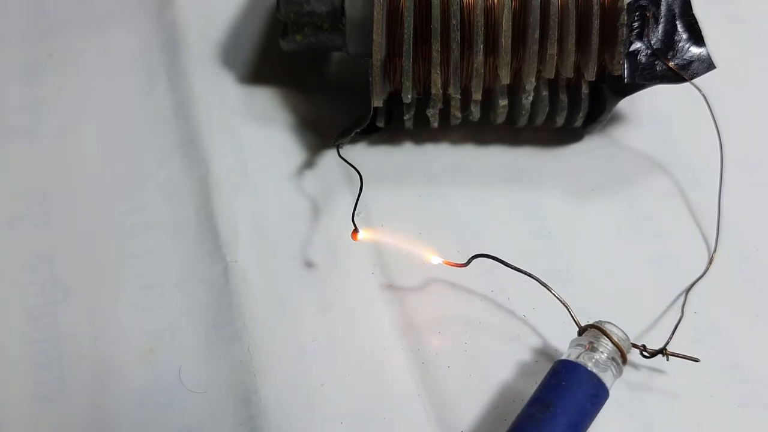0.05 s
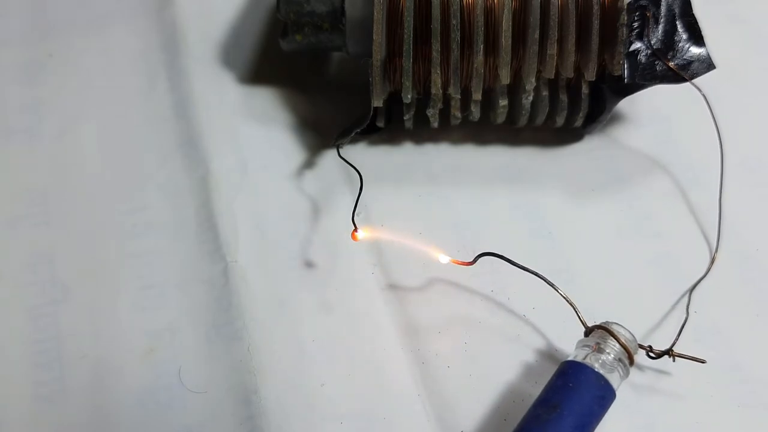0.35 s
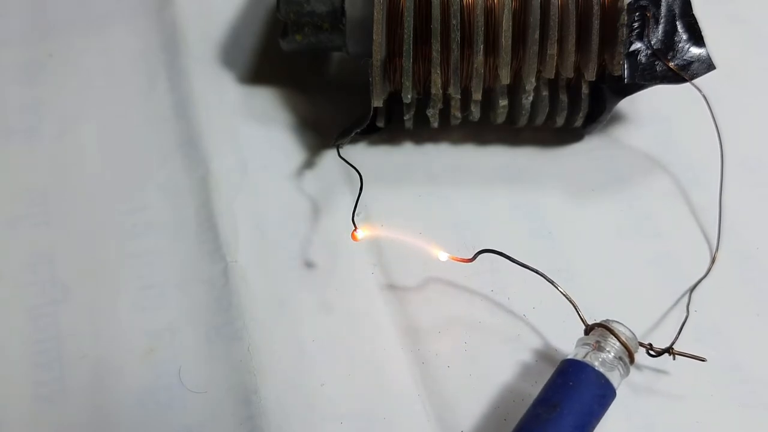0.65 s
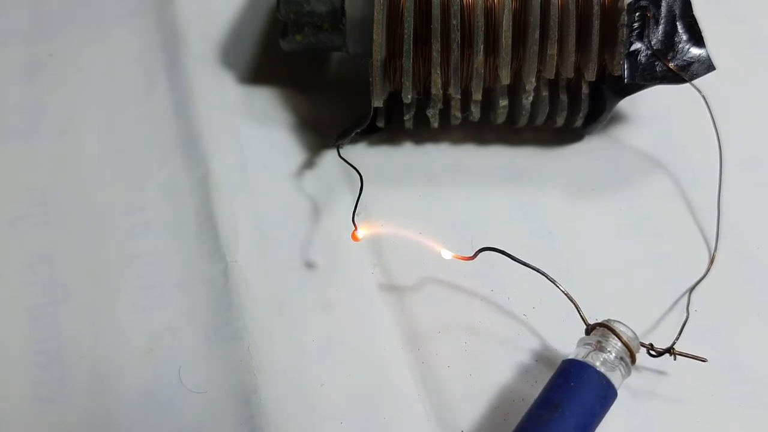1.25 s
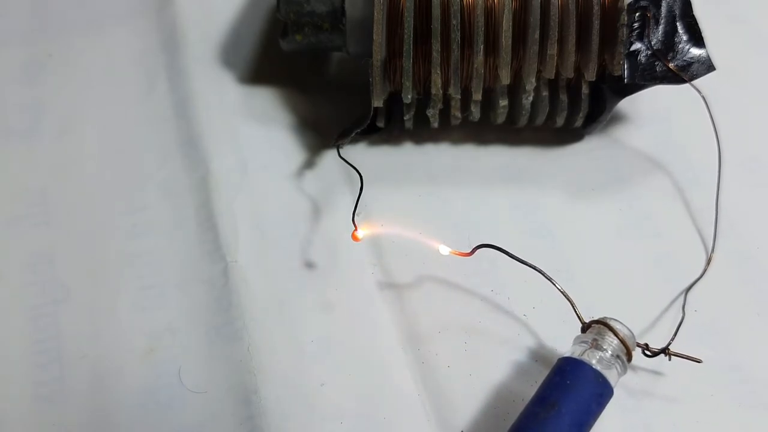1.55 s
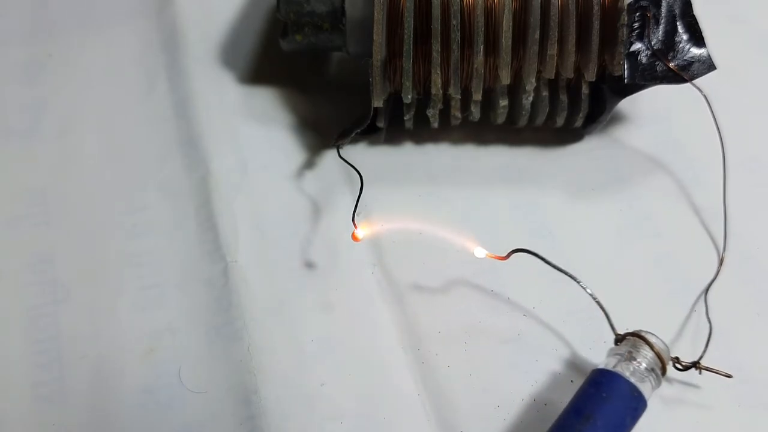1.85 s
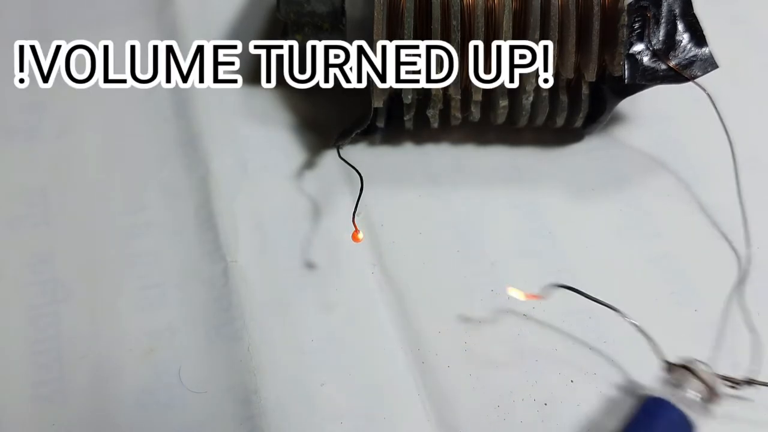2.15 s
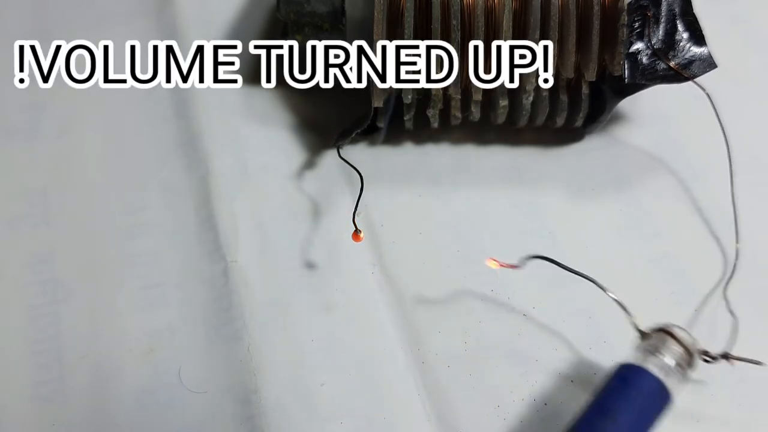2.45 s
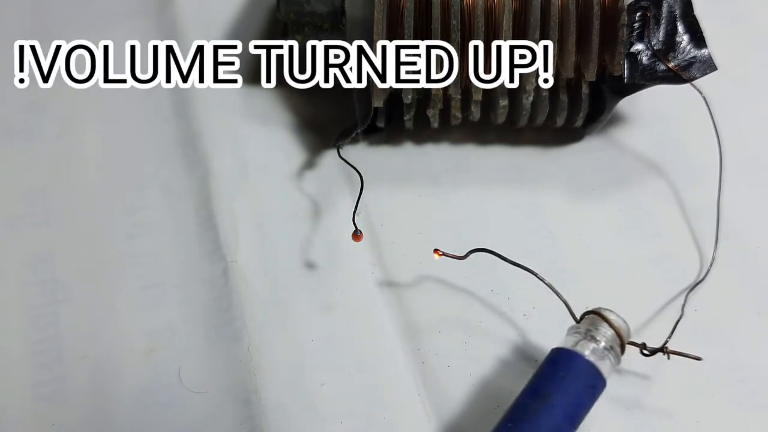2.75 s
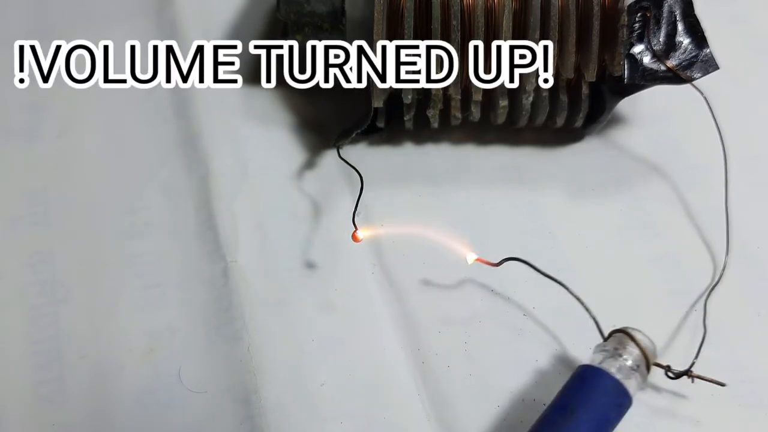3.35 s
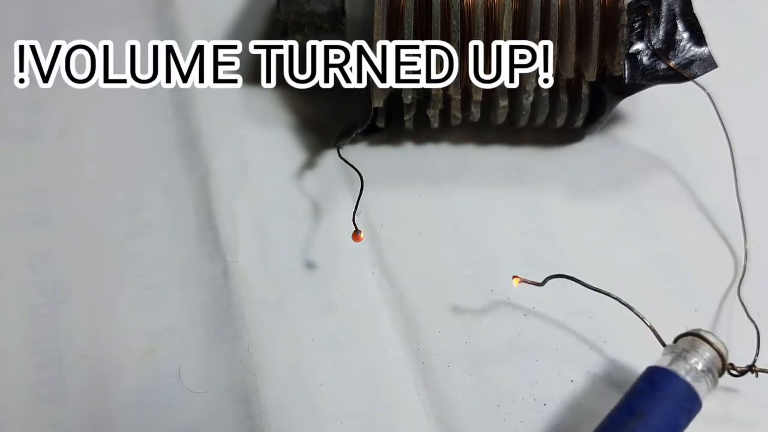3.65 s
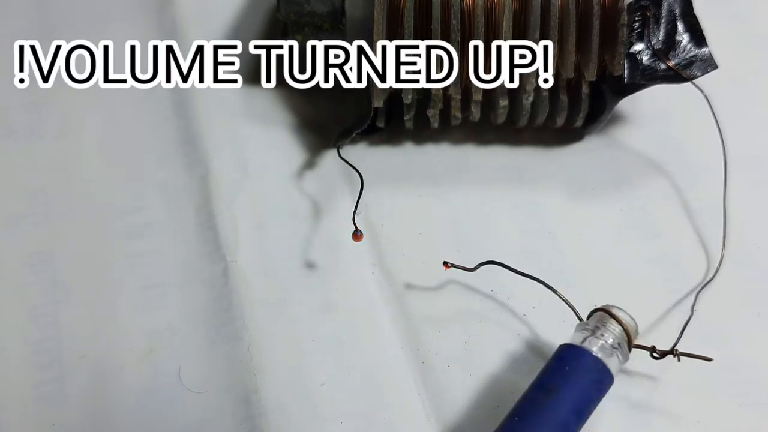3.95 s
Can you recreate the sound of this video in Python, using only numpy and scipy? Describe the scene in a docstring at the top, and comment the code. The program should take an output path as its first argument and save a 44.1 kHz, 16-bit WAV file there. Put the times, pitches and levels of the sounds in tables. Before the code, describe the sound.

A small electric arc hisses softly between two wires with a thin whistle, flares, flutters like a flame and snaps out. It restrikes twice with sparks and shrill squeals, close to the microphone in a faintly humming room.

```python
"""A quiet, humming room: on a table, near the microphone, a small high-voltage arc joins two wires.
The burning channel radiates broadband hiss and whistles at the pitch of its transformer.
Stretched, it flares, flutters like a flame and snaps out, and the transformer core rings briefly.
It is struck twice more, each time with a spark and a shrill squeal, and is pulled apart again."""
import sys
import numpy as np
from scipy import signal
from scipy.fft import rfft, irfft, next_fast_len
from scipy.io import wavfile
from scipy.ndimage import uniform_filter1d, minimum_filter1d, map_coordinates

SR = 44100
rng = np.random.default_rng(int(sys.argv[2]) if len(sys.argv) > 2 else 0)


def digitize_waveform(pressure):
    """Quantize a signal to 16-bit integers and store it at the path in sys.argv[1].

    Rows of a 2-D input are taken as channels; values are limited to [-1, 1].
    """
    field = np.atleast_2d(pressure).T
    bounded = np.clip(field, -1, 1)
    quanta = np.round(bounded * 32767).astype(np.int16)
    wavfile.write(sys.argv[1], SR, quanta)


N = 176400


def amp(db):
    """Decibel law: 20 dB is a factor of ten in amplitude."""
    return 10 ** (np.asarray(db) / 20)


def unit(x):
    """Normalisation to an rms of 1."""
    return x / np.sqrt(np.mean(x ** 2) + 1e-20)


def clock():
    """Uniform sampling: the time of each sample in seconds."""
    return np.arange(N) / SR


def along(points, hz):
    """Interpolation of (frequency, value) points on a logarithmic frequency axis."""
    point_hz, values = np.transpose(points)
    return np.interp(np.log(hz + 1), np.log(point_hz + 1), values)


def pan(side_db):
    """Constant-power panning: side_db is the level of the left channel over the right."""
    gains = np.array([np.atleast_1d(amp(side_db / 2)), np.atleast_1d(amp(-side_db / 2))])
    return gains / np.sqrt(np.mean(gains ** 2, axis=0))


def gate(t, length_s, rise_s, fall_s):
    """Exponential attack from t = 0 and exponential decay after length_s."""
    return (1 - np.exp(-np.maximum(t, 0) / rise_s)) * np.exp(-np.maximum(t - length_s, 0) / fall_s)


def wobble(knots_per_s):
    """Smooth random modulation: a spline through Gaussian values."""
    knots = rng.standard_normal(int(N * knots_per_s / SR) + 4)
    return map_coordinates(knots, [clock() * knots_per_s])


def filtered(x, response):
    """Linear filtering: the spectrum is multiplied by a frequency response."""
    size = next_fast_len(N + SR // 4)
    return irfft(rfft(x, size) * response(np.fft.rfftfreq(size, 1 / SR)), size)[..., :N]


def noise(spectrum, channels=1):
    """Spectral shaping: white noise is coloured and scaled to an rms of 1."""
    return unit(filtered(rng.standard_normal((channels, N)), lambda hz: amp(along(spectrum, hz))))


def add(out, start_s, sound):
    """Superposition: a sound is summed into out from start_s on."""
    part = out[:, max(round(start_s * SR), 0):][:, :sound.shape[-1]]
    part += sound[..., :part.shape[-1]]


# spectrum of the room's air noise: frequency_hz, density_db
AIR_SPECTRUM = [(20, -31.5), (45, -13), (100, -7.5), (170, -10), (260, -2.5), (370, 0.5), (480, -4.5),
                (700, -8.5), (1000, -16.5), (1300, -29), (1800, -28.5), (2400, -38.5), (3300, -39),
                (4800, -46), (6300, -29), (7500, -43.5), (9800, -41), (11200, -33), (12200, -51.5)]
# partials of the fan: pitch_hz, level_db
FAN_PARTIALS = [(301.5, -73), (376.8, -68), (544, -76.5), (646.0, -77.5), (748, -85), (861.3, -85),
                (1507, -92), (1724, -96.5)]
# set curve for the recorder's automatic gain, background held down, then recovering: time_s, gain_db
RECORDER_GAIN = [(0, -3.5), (1.7, -2.5), (2.25, 0.5), (2.7, 1.5), (4, 2.5)]

def air_and_fan(air_db=-63.5, coherence=0.36, waver_db=1.5, drift_hz=0.5):
    """Partly coherent air noise forms a continuous spectrum under the line spectrum of a fan."""
    air = np.sqrt(coherence) * noise(AIR_SPECTRUM)
    air = air + np.sqrt(1 - coherence) * noise(AIR_SPECTRUM, channels=2)
    hum = np.zeros(N)
    for pitch_hz, level_db in FAN_PARTIALS:
        level = amp(level_db + waver_db * wobble(6.4))
        phase = 2 * np.pi * np.cumsum(pitch_hz + drift_hz * wobble(6.12)) / SR
        hum += level * np.sqrt(2) * np.sin(phase)
    gain = amp(np.interp(clock(), *np.transpose(RECORDER_GAIN)))
    return gain * (amp(air_db) * air + hum)


# reverberation time of the room: frequency_hz, t60_s
ROOM_DECAY = [(150, 0.22), (2000, 0.35), (8000, .36), (15000, 0.15)]

def reverberation(x, early_t60_s=0.05, early_db=-9, tail_db=-16):
    """Convolution with a decaying response: early reflections off nearby things, then the room's tail."""
    hz, frame_s, spectra = signal.stft(rng.standard_normal((2, SR // 2)), SR, nperseg=256)
    decay = amp(-60 * frame_s / along(ROOM_DECAY, hz)[:, None])
    tail = signal.istft(spectra * decay, SR, nperseg=256)[1]
    t = np.arange(tail.shape[1]) / SR
    early = rng.standard_normal(tail.shape) * amp(-60 * t / early_t60_s)
    response = amp(tail_db) * tail / np.linalg.norm(tail[0])
    response += amp(early_db) * early / np.linalg.norm(early[0])
    return signal.fftconvolve(x, response, axes=1)[:, :N]


def direct_path(hz, left_lead_s=0.0001505):
    """Arrival-time difference: the sound reaches the nearer, left microphone port first."""
    return np.exp(1j * np.pi * hz * left_lead_s * np.array([[1], [-1]]))


# echoes off the table and the coil, left port then right: delay_s, gain
CLOSE_ECHOES = [
    [(.00085, 0.046), (.0019, -0.067), (.0034, 0.036)],
    [(.00078, 0.27), (.0021, -.3), (.0041, 0.15)],
]

def path_with_echoes(hz):
    """Comb filtering: the direct sound interferes with its closest echoes."""
    combs = [1 + sum(gain * np.exp(-2j * np.pi * hz * delay_s) for delay_s, gain in port)
             for port in CLOSE_ECHOES]
    return direct_path(hz) * np.array(combs)


# spectrum of every tick and crack: frequency_hz, density_db
CRACK_SPECTRUM = [(100, 13.5), (600, 6), (2000, -6.5), (4000, -7.5), (6000, -4), (10000, 7.5),
                  (12000, 11.5), (15200, 11), (16300, -17.5)]
# resonances of the transformer core: centre_hz, bandwidth_hz, gain_db
CORE_MODES = [(5370, 980, -9.5), (8100, 140, 10), (10600, 550, -6), (13600, 1300, -0.5)]
# breaks of the current: start_s, level_db
BREAKS = [(2.2003, -33), (3.511, -35)]
TICK_DECAY_S = 0.00041

def snaps(tick_gain_db=3, ring_gain_db=-2.5, ring_decay_s=0.0032):
    """Damped resonance: the current breaks with a tick and a dry ring of the transformer core."""
    def core(hz):
        return sum(amp(db) / (1 + (2 * (hz - centre) / width) ** 2) for centre, width, db in CORE_MODES)

    tick, ring = np.zeros((2, 1, N))
    t = np.arange(SR // 5) / SR
    for start_s, level_db in BREAKS:
        add(tick, start_s, amp(level_db + tick_gain_db) * np.exp(-t / TICK_DECAY_S))
        add(ring, start_s, amp(level_db + ring_gain_db) * np.exp(-t / ring_decay_s))
    return tick * noise(CRACK_SPECTRUM) + ring * unit(filtered(rng.standard_normal(N), core))


# spectrum of the air's rumble, during and after the arc: frequency_hz, density_db
RUMBLE_SPECTRUM = [(20, -35.5), (40, -8), (65, 4), (130, -4), (300, -14.5), (700, -23.5), (2000, -50)]

def wake(level_db=-50):
    """Exponential decay: the air still rumbles after the last break."""
    envelope = gate(clock() - BREAKS[-1][0], 0, rise_s=0.00024, fall_s=0.18)
    return amp(level_db) * envelope * noise(RUMBLE_SPECTRUM, channels=2)


# spark discharges: start_s, level_db, side_db
DISCHARGES = [(0.144, -58, -9), (0.19, -48, -4), (0.357, -51.5, 7), (0.37, -48, -3), (0.404, -49.5, 11),
              (0.517, -51, 13), (0.655, -51, 3), (.6712, -48, 1), (.6845, -52, 2), (.716, -44.5, -2),
              (0.7346, -46, 7), (.7515, -52, -3), (.7588, -44.5, 6), (.7662, -48.5, 4), (0.7763, -41.5, 15),
              (0.782, -46, -5), (0.8195, -46.5, 8), (.8292, -46, 6), (1.7458, -40, 5), (1.8445, -43.5, 1),
              (1.8504, -51, 9), (1.877, -53.5, 9), (1.9025, -48, -0.5), (2.0135, -49.5, 1),
              (2.1423, -52, 7), (2.9686, -33, 3.5), (2.982, -42.5, 12), (2.9983, -31.5, -1.5),
              (3.0655, -30, 1.5), (3.075, -50, -4), (3.0812, -45.5, 7), (3.3125, -24.5, 32.5),
              (3.3155, -25.5, 35), (3.328, -24.5, 10)]

def sparks(decay_s=0.00074, median_pulse_db=-48.5, pulse_s=0.00036, pulse_db_per_db=0.7):
    """Impulsive sources: each spark is a dry crack with one pressure pulse that grows with its level."""
    envelope, pressure = np.zeros((2, 2, N))
    t = np.arange(SR // 30) / SR
    median_db = np.median(np.transpose(DISCHARGES)[1])
    pulse = -t / pulse_s * np.exp(1 - t / pulse_s)
    for start_s, level_db, side_db in DISCHARGES:
        add(envelope, start_s, amp(level_db) * pan(side_db) * np.exp(-t / decay_s))
        pulse_db = median_pulse_db + pulse_db_per_db * (level_db - median_db)
        add(pressure, start_s, amp(pulse_db) * pan(side_db) * pulse)
    return envelope * noise(CRACK_SPECTRUM) + pressure


# pops of the flame: centre_s, peak_db, half_width_s, side_db
FLAME_POPS = [(1.838, -30, 0.00044, -22.5), (1.854, -28, 0.0014, -21.5), (1.864, -42.5, 0.0025, 1.5),
              (1.881, -34.5, 0.00073, -2), (1.912, -27.5, 0.00091, -11.5), (1.947, -40, 0.0015, 1),
              (2.0036, -42, 0.00044, -17), (2.024, -30, 0.0023, -5.5), (2.041, -38, 0.0019, 6),
              (2.0533, -32.5, 0.0018, -21), (2.144, -29.5, 0.001, -1), (2.1531, -35, 0.0011, -15),
              (2.1612, -31, 0.0027, -7), (2.187, -29, 0.00049, -19), (2.968, -33.5, 0.00042, 18),
              (2.977, -39.5, 0.0015, 15), (3.067, -34, 0.0011, -15), (3.3232, -30, 0.00087, 24),
              (3.3316, -27.5, 0.0022, 30.5), (3.403, -31.5, 0.0011, -14), (3.424, -23.5, 0.0018, -15.5)]

def pops(left_lag_s=0.0014):
    """Bipolar pulses: the hot channel jumps, pushing then pulling air; the gust arrives right first."""
    out = np.zeros((2, N))
    for centre_s, peak_db, half_width_s, side_db in FLAME_POPS:
        offset = (clock() - centre_s - np.array([[left_lag_s], [0]])) / half_width_s
        out -= amp(peak_db) * pan(side_db) * offset * np.exp((1 - offset ** 2) / 2)
    return out


# chirps of the flame: start_s, length_s, level_db, first_hz, last_hz, buzz_ratio, side_db
FLAME_CHIRPS = [(0.024, 0.0078, -61, 604, 914, 0.24, 18), (0.08, 0.017, -64.5, 730, 982, 0.1, 24),
                (0.183, 0.032, -68.5, 1320, 1014, 0.1, 24), (0.262, 0.031, -73, 1157, 1450, 0.2, 13),
                (0.371, 0.055, -73, 1138, 1600, .05, 17), (0.422, 0.13, -73, 1293, 1320, .05, 23),
                (1.725, 0.016, -66, 1390, 2122, .05, 4), (1.836, 0.015, -34, 428, 518.5, 0.56, -2.5),
                (1.867, 0.012, -55.5, 990, 1454, 0.7, 7.5), (1.968, 0.024, -53, 847, 1240, 0, -18),
                (2.024, 0.036, -55.5, 905, 1657, 0.11, -12), (2.171, 0.0184, -50.5, 1012, 1774, 0.09, -9)]
FLAME_RISE_S, FLAME_FALL_S = 0.00024, 0.0021

def sputters(jitter_hz=70, rough_db=4):
    """Harmonic series: the flame's rough glides sharpen into pulse trains as their overtones grow."""
    out = np.zeros((2, N))
    t = np.arange(SR // 6) / SR
    jitter = jitter_hz * wobble(350)
    for start_s, length_s, level_db, first_hz, last_hz, buzz_ratio, side_db in FLAME_CHIRPS:
        hz = np.interp(t, [0, length_s], [first_hz, last_hz]) + jitter[round(start_s * SR):][:len(t)]
        phasor = np.exp(2j * np.pi * np.cumsum(hz) / SR)
        # geometric series: each harmonic is buzz_ratio times the one below
        pulses = unit((phasor / (1 - buzz_ratio * phasor)).real)
        envelope = gate(t, length_s, FLAME_RISE_S, FLAME_FALL_S)
        add(out, start_s, amp(level_db) * pan(side_db) * envelope * pulses)
    return out * unit(amp(rough_db * wobble(280)))


# spectrum of the flame before its low-pass: frequency_hz, density_db
FLAME_SPECTRUM = [(20, -30.5), (45, 11), (110, 2.5), (200, -8), (450, -4), (900, -16), (2000, -24),
                  (6000, -36.5)]
# puffs of the flame: start_s, length_s, level_db, first_cutoff_hz, last_cutoff_hz, side_db
FLAME_PUFFS = [(0.013, 0.015, -52, 810, 900, 14), (0.08, 0.016, -53, 895, 990, 28),
               (0.136, 0.012, -52.5, 390, 298, 19), (0.34, 0.036, -61, 580, 700, 18),
               (.618, 0.013, -53.5, 500, 600, 24), (1.834, 0.011, -37, 1300, 1810, -12.5),
               (1.864, 0.014, -37, 1000, 2030, -1.5), (1.897, 0.017, -35.5, 900, 980, -8),
               (1.926, 0.032, -40.5, 500, 476, -4.5), (1.965, 0.034, -42.5, 1020, 1000, -34),
               (2.017, 0.034, -37, 700, 1420, -9.5), (2.137, 0.028, -34, 450, 403, -4.5),
               (2.17, 0.0236, -37, 900, 2300, -16.5), (2.966, 0.019, -42.5, 2150, 894, -3),
               (2.993, 0.022, -48.5, 600, 390, -4.5), (3.064, 0.022, -41, 690, 590, -12),
               (3.324, 0.007, -37.5, 1810, 2400, 21), (3.388, 0.053, -37, 1100, 600, -22.5),
               (3.441, 0.028, -41, 1200, 1610, -19.5), (3.48, 0.019, -37, 604, 1107, -16)]

def flutter(order=1.43, peak_db=5, peak_width=0.16):
    """Resonant low-pass noise: each puff of the flame has a sliding upper edge that sings a little."""
    out = np.zeros((2, N))
    t = np.arange(SR // 3) / SR
    for start_s, length_s, level_db, first_hz, last_hz, side_db in FLAME_PUFFS:
        hz, frame_s, spectra = signal.stft(rng.standard_normal((2, len(t))), SR, nperseg=512)
        cutoff_hz = np.interp(frame_s, [0, length_s], [first_hz, last_hz])
        ratio = hz[:, None] / cutoff_hz
        colour = amp(along(FLAME_SPECTRUM, hz))[:, None] / np.sqrt(1 + ratio ** (2 * order))
        resonance = amp(peak_db / (1 + ((ratio - 1) / peak_width) ** 2))
        puff = signal.istft(spectra * colour * resonance, SR, nperseg=512)[1][:, :len(t)]
        puff *= gate(t, length_s, FLAME_RISE_S, FLAME_FALL_S)
        rms = np.sqrt(np.sum(puff ** 2, axis=1, keepdims=True) / (length_s * SR))
        add(out, start_s, amp(level_db) * pan(side_db) * puff / rms)
    return out


# squeals and the beat tone (at 1.773 s): start_s, length_s, level_db, first_hz, last_hz, noise_share
TONE_GLIDES = [(1.743, .014, -33, 15040, 11900, 0.6), (1.773, 0.035, -37.5, 10150, 1677, 0.02),
               (2.1987, 0.0024, -32.5, 15800, 14440, 0.3), (2.9696, 0.0027, -15, 15400, 15100, .02),
               (2.973, 0.0075, -17.5, 14600, 13900, 0.2), (2.983, 0.068, -50, 14200, 14250, 1),
               (3.31, 0.025, -33, 15630, 15500, .15), (3.329, 0.012, -6.5, 15100, 15450, 0.02),
               (3.34, 0.037, -57, 15900, 15700, .3), (3.5, 0.002, -47, 15200, 14200, .3)]

def squeals_and_beat(jitter_hz=50, fizz_per_s=1000):
    """Frequency modulation: short squeals of the whistle, and one long falling beat tone in the flare."""
    out = np.zeros((1, N))
    t = np.arange(SR // 8) / SR
    jitter = jitter_hz * wobble(600)
    fizz = unit(wobble(fizz_per_s)) + 1j * unit(wobble(fizz_per_s))
    for start_s, length_s, level_db, first_hz, last_hz, noise_share in TONE_GLIDES:
        samples = round(start_s * SR) + np.arange(len(t))
        hz = np.interp(t, [0, length_s], [first_hz, last_hz]) + jitter[samples]
        amplitude = np.sqrt(2 * (1 - noise_share)) + np.sqrt(noise_share) * fizz[samples]
        tone = (amplitude * np.exp(2j * np.pi * np.cumsum(hz) / SR)).imag
        add(out, start_s, amp(level_db) * gate(t, length_s, rise_s=0.00067, fall_s=0.0018) * tone)
    return out


# spectrum of the whistle's sizzling lower fringe: frequency_hz, density_db
SIZZLE_SPECTRUM = [(9000, -110), (12000, -46), (13500, -35), (14500, 1), (15100, -5), (15450, 10),
                   (15750, -44.5)]
# course of the transformer's whistle: time_s, tone_db, sizzle_db
WHISTLE_LEVELS = [(0.002, -17, -31), (0.006, -45, -19), (0.017, -9, -21.5), (0.024, -20, -18),
                  (0.032, -40, -58), (0.052, -50, -50), (0.104, -23.5, -38), (0.154, -49, -62),
                  (0.168, -39, -44), (0.221, -35.5, -38), (0.26, -54, -58), (0.276, -57, -41),
                  (0.332, -80, -58), (0.36, -62, -48.5), (0.524, -71, -51), (0.59, -82, -64),
                  (0.62, -69, -48), (0.65, -93, -82)]

def whistle(pitch_hz=15450, jitter_hz=45, rough_db=3, tone_gain_db=3.5, sizzle_gain_db=-5):
    """Forced oscillation: the transformer drives a thin, unsteady tone that fades as the arc settles."""
    time_s, tone_db, sizzle_db = np.transpose(WHISTLE_LEVELS)
    t = clock()
    phase = 2 * np.pi * np.cumsum(pitch_hz + jitter_hz * wobble(293.5)) / SR
    tone = amp(np.interp(t, time_s, tone_db) + tone_gain_db) * np.sqrt(2) * np.sin(phase)
    sizzle = amp(np.interp(t, time_s, sizzle_db) + sizzle_gain_db) * noise(SIZZLE_SPECTRUM)
    roughness = unit(amp(rough_db * wobble(207.7)))
    return (tone + sizzle) * roughness * gate(t, time_s[-1], rise_s=0.0018, fall_s=0.05)


def crackle(ticks_per_s=30, over_rasp_db=17, scatter_db=4):
    """Poisson process: stray ticks at independent random moments, each decaying exponentially."""
    onsets = rng.random(N) < ticks_per_s / SR
    strength = amp(over_rasp_db + scatter_db * np.clip(rng.standard_normal(N), -2, 1.5))
    envelope = signal.lfilter([1], [1, -np.exp(-1 / (TICK_DECAY_S * SR))], onsets * strength)
    return envelope * noise(CRACK_SPECTRUM)


# spectra of the arc's treble hiss and midrange rasp: frequency_hz, density_db
HISS_SPECTRUM = [(2500, -37), (5000, -19), (5600, -17), (6500, -17), (7200, -27.5), (8000, -18),
                 (9200, -9.5), (10200, -18.5), (11000, -5.5), (11850, -5.5), (12700, -5.5), (14000, -3),
                 (15450, 2.5), (15800, -41.5)]
RASP_SPECTRUM = [(100, 8), (400, 6), (1000, 0.5), (2200, -0.5), (3200, -2), (4400, -3), (6200, -21),
                 (8000, -25), (12000, -28)]
# course of the calm arc: time_s, hiss_db, rasp_db, rasp_side_db, rumble_db
CALM_ARC = [(0.01, -54, -68, 11, -59), (0.222, -74.5, -93.5, -7, -69), (0.366, -62.5, -73.5, 20, -65.5),
            (0.524, -66.5, -77.5, 23.5, -71), (0.572, -68, -78, 11, -100.5), (0.616, -70, -75, 16.5, -76),
            (0.712, -74, -91, 9, -59), (0.784, -70, -75, 13, -64), (0.81, -76, -77, 17, -77),
            (0.866, -62.5, -73.5, 13, -76), (1.01, -68, -75.5, 7, -70), (1.054, -55, -71.5, 8, -67.5),
            (1.12, -57, -85, -3, -67), (1.228, -56, -92, 5, -74.5), (1.566, -58.5, -70, 30, -60),
            (1.584, -58.5, -71.5, 10, -79.5), (1.628, -58, -66, 15, -57.5), (1.706, -57, -74, 5, -80.5),
            (1.74, -58, -64.5, 10, -43.5)]
# courses of the unsteady arc, one per stretch: same columns
UNSTEADY_ARCS = [
    [(1.815, -56.5, -50.5, 0, -52), (1.974, -77, -93, 0, -57), (2.048, -59, -75.5, 0, -47),
     (2.11, -61.5, -69, 0, -56), (2.132, -56.5, -67, 0, -54), (2.142, -65, -59, 0, -58),
     (2.185, -83, -103.5, 0, -75)],
    [(2.97, -52, -64, 0, -54), (3.005, -58.5, -68, 0, -55.5), (3.055, -64, -81.5, 0, -45),
     (3.087, -64.5, -72.5, 0, -56.5), (3.243, -68.5, -86, 0, -52), (3.29, -82.5, -102, 0, -58)],
    [(3.398, -47, -46.5, 0, -60.5), (3.412, -62.5, -51, 0, -55), (3.442, -57.5, -62, 0, -57),
     (3.494, -65, -90.5, 0, -46), (3.5, -65, -54, 0, -48.5)],
]
# flares of the arc: start_s, length_s, hiss_db, rasp_db
ARC_FLARES = [(1.746, 0.0352, -24.5, -43), (1.779, 0.024, -26.5, -38.5), (1.797, 0.014, -32, -32.5),
              (3.324, 0.062, -58.5, -71), (3.376, .006, -35, -53.5), (3.3816, 0.0097, -19.5, -35)]

def burning_arc(rasp_gain_db=2.5, rumble_gain_db=3.5, flare_side_db=6, rise_s=0.0015, fall_s=0.0041):
    """Amplitude-modulated noise: the channel's grainy hiss and rasp leap in flares over a lumpy rumble."""
    def wide(spectrum, spread_db=-6):
        return unit(noise(spectrum) + amp(spread_db) * noise(spectrum, channels=2))

    t = clock()
    hiss, rasp, rumble = np.zeros(N), np.zeros((2, N)), np.zeros(N)  # envelopes
    for course in [CALM_ARC] + UNSTEADY_ARCS:
        time_s, *columns = np.transpose(course)
        hiss_db, rasp_db, side_db, rumble_db = [np.interp(t, time_s, column) for column in columns]
        lit = gate(t - time_s[0], time_s[-1] - time_s[0], rise_s, fall_s)
        hiss += lit * amp(hiss_db)
        rasp += lit * amp(rasp_db + rasp_gain_db) * pan(side_db)
        rumble += lit * amp(rumble_db + rumble_gain_db)
    ticks = rasp * crackle()
    for start_s, length_s, hiss_db, rasp_db in ARC_FLARES:
        lit = gate(t - start_s, length_s, rise_s, fall_s)
        hiss = np.maximum(hiss, lit * amp(hiss_db))
        rasp = np.maximum(rasp, lit * amp(rasp_db) * pan(flare_side_db))
    grain = unit(amp(2 * wobble(900) + wobble(29.9)))  # 2 dB of fast grain, 1 dB of slow waver
    hiss_and_rasp = grain * (hiss * wide(HISS_SPECTRUM) + rasp * wide(RASP_SPECTRUM))
    lumps = amp(3 * wobble(27))
    return ticks + hiss_and_rasp + rumble * unit(lumps * noise(RUMBLE_SPECTRUM, channels=2))


# level difference of the arc at the two microphone ports: frequency_hz, side_db
PORT_BALANCE = [(400, 4.5), (1200, 6.5), (5000, 3), (6500, 1), (8000, -6), (9300, -2), (10800, 3.5),
                (11900, 0), (13400, 4), (14200, 7), (15300, 16)]

def scene():
    """Superposition of direct and reverberant sound: the arc is nearer the left port; the room hums."""
    tones = whistle() + squeals_and_beat()
    noises = burning_arc() + flutter() + pops() + sputters() + sparks() + snaps()
    close = filtered(noises, path_with_echoes) + filtered(tones, direct_path)
    arc = filtered(close + reverberation(tones + noises), lambda hz: pan(along(PORT_BALANCE, hz)))
    return arc + wake() + air_and_fan()


def record(dry, low_cut_hz=11, ceiling=0.93, top_hz=16600):
    """Band and peak limiting: deep bass rolls off, peaks are held down and the top treble is cut."""
    thinned = filtered(dry, lambda hz: hz ** 3 / np.sqrt(hz ** 6 + low_cut_hz ** 6))
    needed_gain = ceiling / np.maximum(np.abs(thinned).max(axis=0), ceiling)
    gain = uniform_filter1d(minimum_filter1d(needed_gain, size=221), size=221)  # 5 ms windows
    return filtered(thinned * gain, lambda hz: np.clip((top_hz - hz) / 200, 0, 1))


dry = scene()
out = record(dry)
digitize_waveform(out)
```